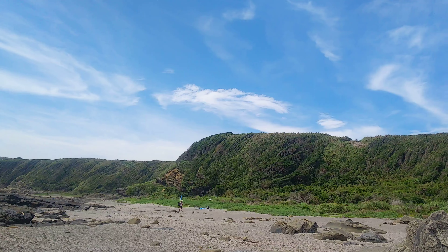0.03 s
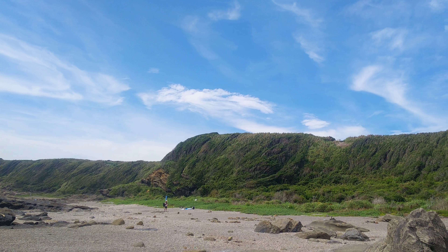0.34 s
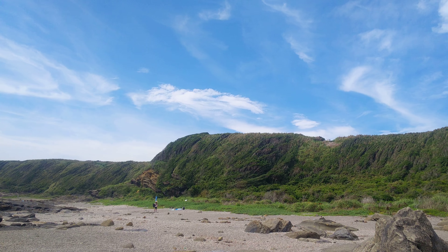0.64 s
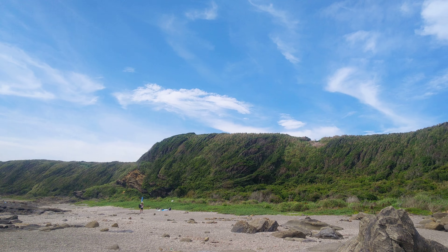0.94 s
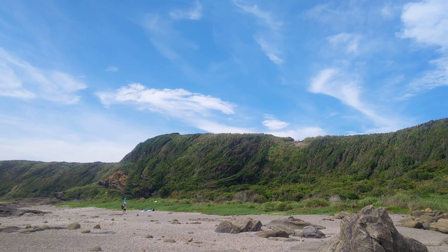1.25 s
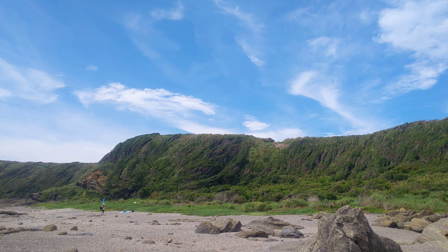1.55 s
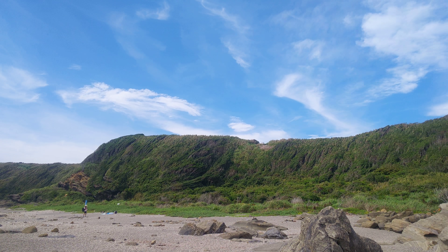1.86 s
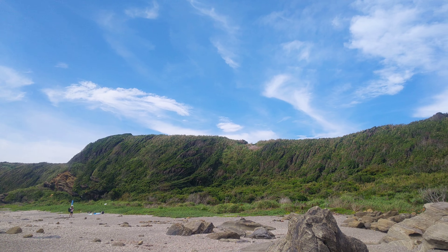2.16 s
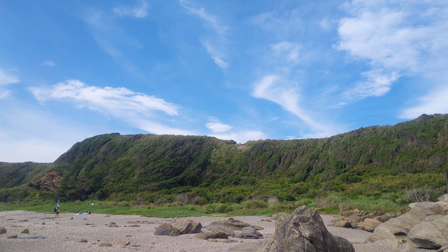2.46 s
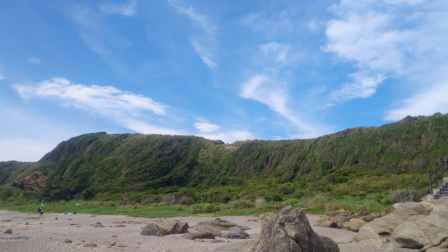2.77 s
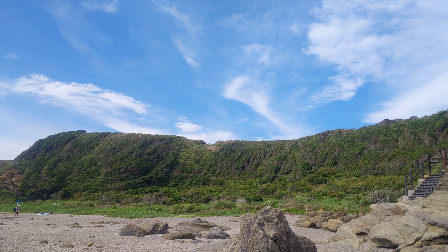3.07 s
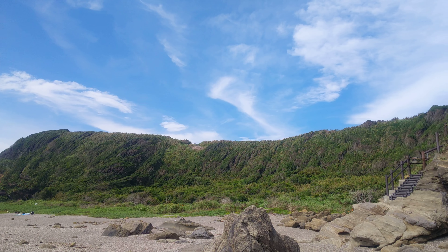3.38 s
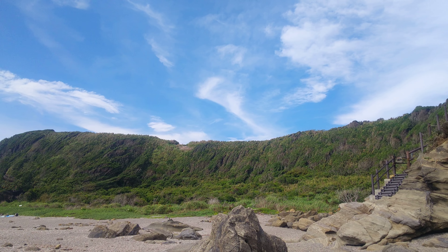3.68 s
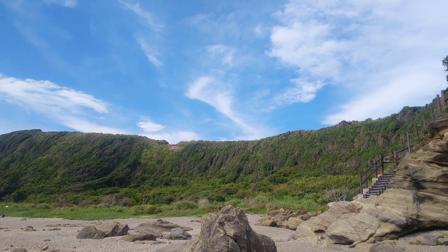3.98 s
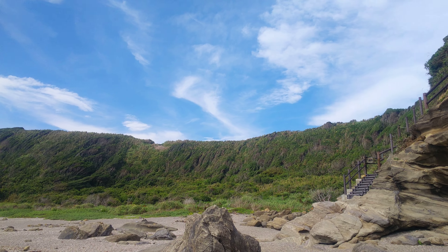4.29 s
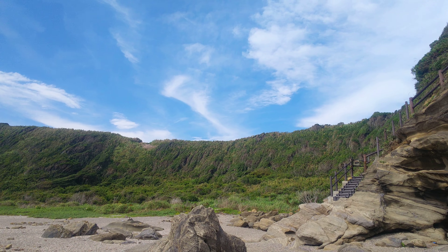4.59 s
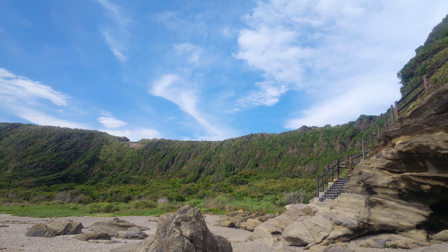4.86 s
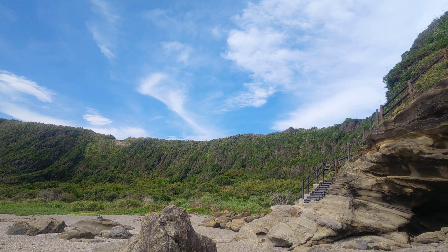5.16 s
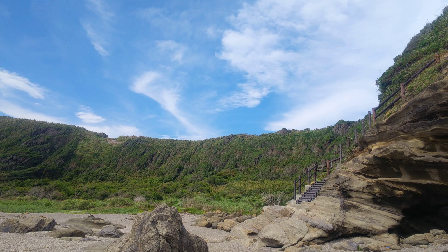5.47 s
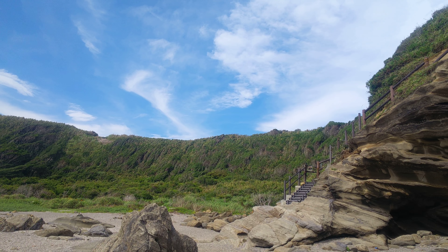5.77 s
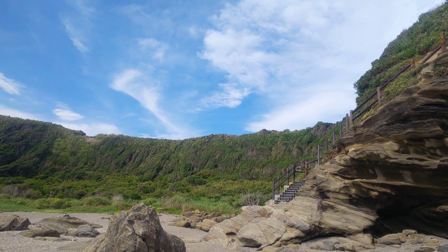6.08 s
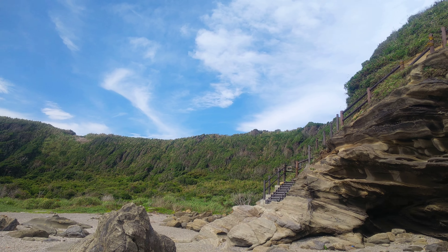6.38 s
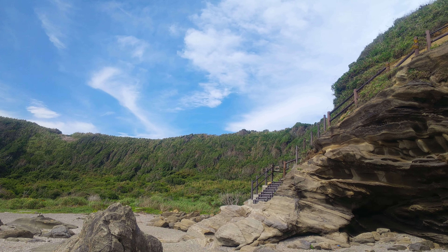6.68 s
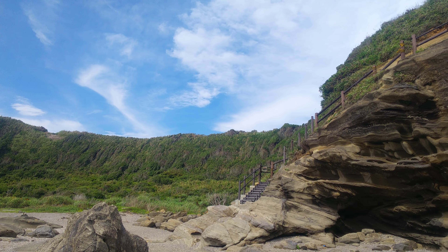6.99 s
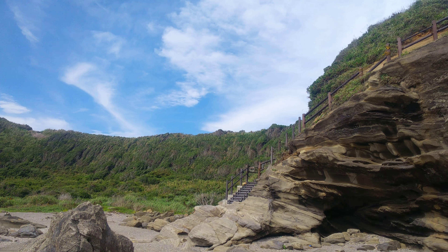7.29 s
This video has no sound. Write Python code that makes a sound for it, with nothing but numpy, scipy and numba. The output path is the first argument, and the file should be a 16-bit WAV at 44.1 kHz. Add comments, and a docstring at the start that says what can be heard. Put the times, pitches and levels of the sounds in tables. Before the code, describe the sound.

Soft wind and distant surf hiss steadily in a rocky cove, with a thin shimmer of insects. Loud electrical pops crack on the left. A songbird then gives a few buzzy chips and whistles a phrase of short sliding notes with a slight echo. More pops hit as the song ends, briefly ducking everything else. The hand-held microphone picks up faint bumps and rubs throughout.

```python
"""A songbird whistles a phrase of sliding notes from the scrub of a rocky cove, led in by buzzy chips.
The rocks throw its song back; behind it lie faint far birds, wind, shrilling insects and distant surf
with one brief soft wash. A hand-held camera is bumped and brushed as it pans. A loose contact pops
in its left channel, and the limiter ducks everything after the biggest pops."""
import sys
import numpy as np
from scipy import signal
from scipy.fft import rfft, irfft
from scipy.io import wavfile
from scipy.ndimage import uniform_filter1d, minimum_filter1d, map_coordinates
from numba import njit

SR = 44100
rng = np.random.default_rng(int(sys.argv[2]) if len(sys.argv) > 2 else 0)


def wav_out(sig):
    """Save sig, one row per channel (or a flat mono array), as 16-bit PCM at SR to the path in sys.argv[1]."""
    wavfile.write(sys.argv[1], SR, np.round(np.clip(np.atleast_2d(sig).T, -1, 1) * 32767).astype(np.int16))


N = 323694
T = np.arange(N) / SR
HZ = np.maximum(np.arange(N // 2 + 1) * SR / N, 1e-3)

# short swells of noise, one a wash of surf and the rest camera bumps and scuffs:
# (peak time [s], level [dB], centre [Hz], spread [s], left minus right [dB])
NOISE_SWELLS = [(1.692, -49, 816, 0.031, -1), (2.427, -40, 109, 0.014, -16), (2.628, -54, 4530, 0.023, -15),
                (2.733, -42, 64, 0.04, -5), (2.922, -43.5, 88, 0.048, -14), (3.786, -41, 94, 0.0091, 13),
                (4.213, -47.5, 510, 0.0072, -19), (5.592, -56, 2450, 0.06, 0),
                (6.694, -41.5, 400, 0.0072, 3), (7.014, -54.5, 4700, 0.016, -8),
                (7.294, -39, 300, 0.0035, 2)]
SURF_WASH_ROW = 7


def songbird(ahead_s=1.95, lead_s_per_s=0.000053):
    """The singer, louder on the left; as the camera pans, the left leads in time but its lean shrinks."""
    voice = chips() + phrase()
    panned_s = T - ahead_s
    lean_db = 10.5 - 1.1 * panned_s
    placed = cove(voice, lean_db, lag_s=-lead_s_per_s * panned_s, near_db=-13, far_db=-7.5)
    return placed + ledge_echoes(voice, panned_s)


def phrase(gain_db=-6, throat_hz=3030, throat_width_hz=1500):
    """Each note swoops to a turning pitch and slides on; the throat favours the middle of the range."""
    # whistled notes: (start [s], length [s], swoop length [s], start pitch [Hz], turning pitch [Hz],
    # end pitch [Hz], bend [-], relative level [dB], swell over the note [dB], trill depth [Hz])
    score = [ (1.847, 0.21, 0.035, 2640, 2666, 3370, -0.061, -45, 2.5, 30),
             (2.568, 0.22, 0.047, 2540, 2836, 3266, -0.21, -41, 7.5, 19),
             (2.915, 0.22, 0.095, 2340, 3020, 2600, -0.4, -42.5, 2.5, 80),
             (3.225, .25, 0.064, 3610, 2840, 3058, 1.17, -40.5, 1, 14),
             (3.587, 0.25, 0.094, 2540, 2908, 2604, -0.95, -39.5, -1, 115),
             (3.914, 0.28, 0.083, 3670, 2678, 3086, 0.84, -38.5, 2, 16),
             (4.472, 0.12, 0.0172, 3470, 3195, 2140, 0.35, -40.5, -5, 51),
             (4.653, 0.235, 0.06, 2076, 1977, 2520, -0.35, -37, -3, 13),
             (4.893, 0.088, 0.06, 2510, 2560, 2570, 0, -41.5, 8, 8),
             (5.088, 0.27, 0.062, 3630, 3077, 2664, 0.064, -40, 2, 68), ]
    notes = []
    for start, length, swoop_s, start_hz, turn_hz, end_hz, bend, db, swell_db, trill_depth_hz in score:
        swoop = slide(start, swoop_s, start_hz, turn_hz, bend=0.94)
        onward = slide(start + swoop_s, length - swoop_s, turn_hz, end_hz, bend)
        glide = np.where(T < start + swoop_s, swoop, onward)
        notes.append((start, length, glide, db, swell_db, trill_depth_hz))
    return undb(gain_db) * filtered(whistle(notes), band(throat_hz, throat_width_hz))


def chips(gain_db=-8.5, buzz_hz=205, buzz_depth=0.64):
    """Short falling notes lead into the phrase, roughened by a fast tremolo."""
    # chips: (start [s], length [s], start pitch [Hz], end pitch [Hz], relative level [dB])
    score = [(1.49, 0.03, 3450, 2700, -43), (1.548, 0.06, 3500, 3140, -48.5),
             (2.155, 0.068, 2520, 2140, -50), (2.34, 0.04, 4050, 2750, -42), (2.402, 0.08, 3890, 3180, -45)]
    notes = short_notes(score, bend=-0.72, swell_db=8, trill_depth_hz=40)
    buzz = 1 + buzz_depth * np.sin(2 * np.pi * buzz_hz * T)
    return undb(gain_db) * buzz * whistle(notes, waver_hz=126, flutter_db=2.2)


def whistle(notes, waver_hz=20, flutter_db=2.0, trill_rate_hz=109.8, attack_s=0.014, release_s=0.026):
    """A near-pure syrinx tone glides through each note, swelling or fading; a trill shakes its pitch."""
    out = np.zeros(N)
    waver, flutter = wander(240), wander(86)
    trill_rate = trill_rate_hz * (1 + 0.08 * wander(29))
    trill = np.sin(2 * np.pi * np.cumsum(trill_rate) / SR)
    for start, length, glide, db, swell_db, trill_depth_hz in notes:
        i = np.arange(int(start * SR), int((start + length) * SR))
        t = T[i] - start
        hz = glide[i] + trill_depth_hz * trill[i] + waver_hz * waver[i]
        fades = np.clip(np.minimum(t / attack_s, (length - t) / release_s), 0, 1)
        envelope = undb(db + swell_db * (t / length - .5) + flutter_db * flutter[i]) * fades
        out[i] += np.sqrt(2) * envelope * np.sin(2 * np.pi * np.cumsum(hz) / SR)
    return out


def short_notes(score, bend, swell_db, trill_depth_hz):
    """Notes of a single glide each, ready to be whistled."""
    for start, length, start_hz, end_hz, db in score:
        yield start, length, slide(start, length, start_hz, end_hz, bend), db, swell_db, trill_depth_hz


def slide(start, length, from_hz, to_hz, bend):
    """A curved pitch glide: bend 1 levels off, 0 is straight, -1 steepens."""
    progress = ramp(start, length)
    return from_hz + (to_hz - from_hz) * (progress + bend * progress * (1 - progress))


def ledge_echoes(voice, panned_s, lean_db=-1, rise_db_per_s=1):
    """Slapback from an overhang on the right, growing as the camera turns towards it."""
    # reflections off the ledges: (delay [s], relative level [dB])
    ledges = [(.03, -19.5), (.055, -27)]
    echoes = sum(undb(db) * delayed(voice, lag_s) for lag_s, db in ledges)
    return pan(lean_db) * undb(rise_db_per_s * panned_s) * echoes


def cove(x, lean_db, lag_s, near_db, far_db, near_t60=0.1, far_t60=0.44, rock_lean_db=-7):
    """Direct sound reaches the two mic ports apart in time; rocks on the right scatter it into a tail."""
    out = pan(lean_db) * np.array([delayed(x, lag_s), x])
    for db, t60 in ((near_db, near_t60), (far_db, far_t60)):
        tail = rng.standard_normal((2, N)) * undb(-60 * T / t60) * (T > .004)
        tail /= np.linalg.norm(tail, axis=1, keepdims=True)
        out += pan(rock_lean_db) * undb(db) * filtered(x, rfft(tail))
    return out


def contact_pops(coupling_hz=160, low_cuts=((58, 3.6), (100, 1.3))):
    """Each voltage step sags through the coupling capacitor and rings the low-cut filters (Hz, Q)."""
    # jumps of the loose contact: (time [s], step before filtering [dB])
    steps = [(0.8663, -18.5), (1.183, 6), (1.1882, 1), (1.409, -2), (1.414, 3), (4.8601, 8), (4.8917, 13.5),
             (5.4315, -4.5), (5.4326, 1)]
    # a pop's edge, rounded with a thin snap on top: (frequency [Hz], gain [dB])
    edge_eq = [(1000, -1), (2500, -3.5), (4000, -7), (5200, -14.5), (6200, -21), (8000, -19), (11000, -14),
               (13000, -22), (15000, -28), (16300, -45)]
    impulses = np.zeros(N)
    for time, db in steps:
        impulses[int(time * SR)] += undb(db)
    jf = 1j * HZ
    response = colour(edge_eq) * SR / (2 * np.pi * (jf + coupling_hz))
    for hz, q in low_cuts:
        response *= jf ** 2 / (jf ** 2 + jf * hz / q + hz ** 2)
    return filtered(impulses, response)


def handling():
    """Fingers and strap bump and scuff the camera body."""
    return sum(noise_swell(*row) for i, row in enumerate(NOISE_SWELLS) if i != SURF_WASH_ROW)


def finger_rubs(lean_db=-7):
    """Friction of a finger dragging beside the right port rings the camera's shell."""
    # drags: (peak time [s], level [dB], spread [s])
    drags = [(3.69, -52, 0.036), (3.784, -49, .012), (3.81, -44, 0.0093)]
    # shell resonances: (centre [Hz], width [Hz], relative level [dB])
    modes = [(645, 91, 5), (1010, 170, -5), (1660, 460, -13), (2060, 220, -2), (2880, 1300, -14)]
    ringing = noise(sum(undb(db) * band(hz, width) for hz, width, db in modes))
    envelope = sum(undb(db) * swell(peak_s, spread_s) for peak_s, db, spread_s in drags)
    return pan(lean_db) * ringing * envelope


def far_birds(gain_db=2):
    """Faint pipings from further off on the right, mostly heard off the rocks."""
    # pipings: (start [s], length [s], start pitch [Hz], end pitch [Hz], relative level [dB])
    score = [(0.63, 0.058, 2830, 2790, -58), (1.24, 0.06, 2050, 2140, -59), (2.0, 0.12, 1780, 1754, -60),
             (4.32, 0.067, 2090, 2113, -55)]
    piping = undb(gain_db) * whistle(short_notes(score, bend=0, swell_db=0, trill_depth_hz=25))
    return cove(piping, lean_db=-7, lag_s=0.00026, near_db=5.5, far_db=-24)


def surf_wash():
    """A brief soft wash of surf at about 5.6 s."""
    return noise_swell(*NOISE_SWELLS[SURF_WASH_ROW])


def surf_and_wind(sea_share=0.24, sea_lag_s=0.00038, port_gap_s=0.00055, bass_likeness=0.93):
    """Surf comes straight from the sea on the right and, with the wind, from all round the cove."""
    # tone of the bed: (frequency [Hz], relative level per Hz [dB])
    bed_eq = [(15, -46), (25, -36), (35, -36), (48, -2.5), (68, 1), (96, -4.5), (130, -2.5), (175, -5.5),
              (350, -8), (680, -11.5), (1280, -16), (1900, -20), (2600, -22), (3500, -25), (5000, -30),
              (6500, -38), (8450, -47), (14300, -110)]
    # its stereo balance: (frequency [Hz], left minus right [dB])
    balance = [(500, 0.5), (3500, 0), (4400, -5.5), (5300, -3.5), (6300, -21.5)]
    # its slow rise and fall: (time [s], level [dB])
    fader = [(.9, -42), (1.35, -42), (1.65, -41.5), (2.3, -41), (3.0, -40.5), (3.9, -42), (4.8, -41.5),
             (5.6, -43), (6.1, -42.5), (6.7, -40.5), (7.3, -41)]
    mid, side, sea = rfft(rng.standard_normal((3, N))) * colour(bed_eq)
    alike = bass_likeness * np.sinc(2 * HZ * port_gap_s)  # diffuse sound matches only in the bass
    mid, side = mid * np.sqrt((1 + alike) / 2), side * np.sqrt((1 - alike) / 2)
    around = np.array([mid + side, mid - side])
    straight = np.array([sea * np.exp(-2j * np.pi * HZ * sea_lag_s), sea])
    lean = np.sqrt(colour(balance))
    spectra = (np.sqrt(1 - sea_share) * around + np.sqrt(sea_share) * straight) * np.array([lean, 1 / lean])
    octave = np.clip(np.log2(HZ / 64), 0, 6)
    bed = np.zeros((2, N))
    for k in range(7):  # each octave flickers on its own
        layer = irfft(spectra * np.maximum(1 - abs(octave - k), 0), N)
        bed += layer * undb(0.9 * wander(4.5))
    return unit(bed) * undb(np.interp(T, *np.transpose(fader)))


def insects(left_db=-54, right_db=-51, shimmer_db=0.5, throb_db=5.5):
    """A shimmering chorus in the scrub; a few single insects stand out as thin, throbbing lines."""
    # tone of the chorus on each side: (frequency [Hz], relative level per Hz [dB])
    left_eq = [(5600, -18), (6250, -9.5), (7300, -6), (7900, -6), (8700, -4.5), (9200, -13.5),
               (9800, -14.5), (10300, -17), (12000, -28.5), (13800, -31.5), (15000, -55)]
    right_eq = [(5600, -19.5), (6300, -14), (8050, -5), (8300, 0.5), (8480, -0.5), (8750, 2.5),
                (9100, -1.5), (9350, -1), (9550, -8.5), (9800, -4.5), (10300, -30.5), (12000, -23),
                (13800, -31.5), (15000, -55)]
    # insects holding one pitch: (start [s], end [s], pitch [Hz], width [Hz], level [dB])
    soloists = [(0.56, 1.17, 6440, 170, -63), (1.7, 2.6, 6230, 150, -72), (4.298, 5.646, 7400, 160, -66.5),
                (5.595, 7.402, 7070, 220, -74)]
    turned = ramp(4.9, 0.45)  # the camera turns to the overhang and the chorus dips on the right
    sides = (left_eq, left_db + turned), (right_eq, right_db - 2.5 * turned)
    out = np.array([noise(colour(eq)) * undb(db + shimmer_db * wander(70)) for eq, db in sides])
    for start, end, hz, width, db in soloists:
        gate = np.clip(np.minimum(T - start, end - T) / 0.05, 0, 1)
        shrill = np.array([noise(band(hz, width)) for _ in range(2)])
        out += shrill * gate * undb(db + throb_db * wander(40))
    return out


def noise_swell(peak_s, db, hz, spread_s, lean_db, dull_hz=7000, relative_width=0.65):
    """A band of noise with a soft top swells and fades."""
    soft = np.exp(-(HZ / dull_hz) ** 2)
    return pan(lean_db) * undb(db) * noise(band(hz, relative_width * hz) * soft) * swell(peak_s, spread_s)


def undb(db):
    """Decibels to gain."""
    return 10 ** (np.asarray(db) / 20)


def unit(x):
    """Scale to rms 1."""
    return x / np.sqrt(np.mean(x ** 2))


def colour(points):
    """An EQ curve through (frequency [Hz], gain [dB]) points."""
    hz, db = np.transpose(points)
    return undb(np.interp(np.log(HZ), np.log(hz), db))


def band(hz, width):
    """The gain of a resonance applied twice."""
    return 1 / (1 + ((HZ - hz ** 2 / HZ) / width) ** 2)


def filtered(x, response):
    """Apply a frequency response."""
    return irfft(rfft(x) * response, N)


def noise(response):
    """Noise of rms 1 in the given colour."""
    return unit(filtered(rng.standard_normal(N), response))


def wander(rate_hz):
    """Smooth random modulation of rms 1."""
    return noise(np.exp(-(HZ / rate_hz) ** 2))


def pan(lean_db):
    """Left and right gains for a left-minus-right balance, fixed or moving."""
    return undb(np.vstack([lean_db, -lean_db]) / 2)


def ramp(start, length):
    """Rises evenly from 0 to 1."""
    return np.clip((T - start) / length, 0, 1)


def swell(peak_s, spread_s):
    """A bell-shaped envelope peaking at 1."""
    return np.exp(-.5 * ((T - peak_s) / spread_s) ** 2)


def delayed(x, lag_s):
    """The same sound shifted by a fixed or moving time."""
    return map_coordinates(x, [(T - lag_s) * SR], order=3)


@njit
def peak_hold(excess, step):
    """Jump to every new peak, then let go at an even rate."""
    out, held = np.empty(len(excess)), 0.
    for i in range(len(excess)):
        held = max(excess[i], held - step)
        out[i] = held
    return out


def scene():
    """The cove and the handling in both channels, the pops in the left alone."""
    out = songbird() + far_birds() + surf_and_wind() + insects() + handling() + surf_wash() + finger_rubs()
    out[0] += contact_pops()
    return out


def record(dry, opens_s=0.6, fade_s=0.3, ceiling_db=-0.86, release_db_per_s=18, top_hz=16300):
    """The input opens low and fades up; a stereo-linked look-ahead limiter ducks it; the top is cut."""
    x = dry * (0.1 + 0.9 * ramp(opens_s, fade_s)) * (T > opens_s)
    peak_db = 20 * np.log10(abs(x).max(axis=0) + 1e-9)
    excess_db = np.maximum(peak_db - ceiling_db, 0)
    ahead_db = -minimum_filter1d(-excess_db, size=41)
    duck_db = uniform_filter1d(peak_hold(ahead_db, release_db_per_s / SR), size=21)
    high_cut = signal.ellip(8, .2, 70, top_hz, fs=SR, output="sos")
    return signal.sosfilt(high_cut, x * undb(-duck_db))


dry = scene()
out = record(dry)
wav_out(out)
```